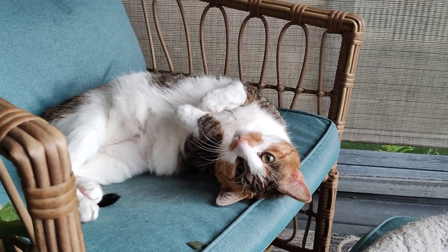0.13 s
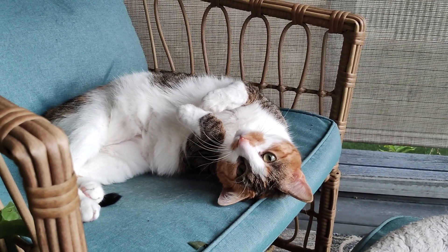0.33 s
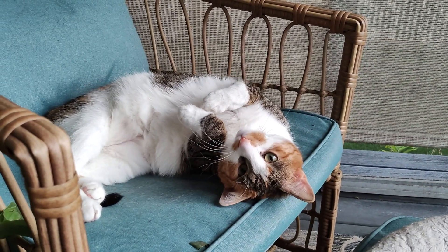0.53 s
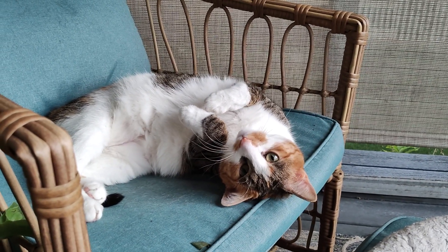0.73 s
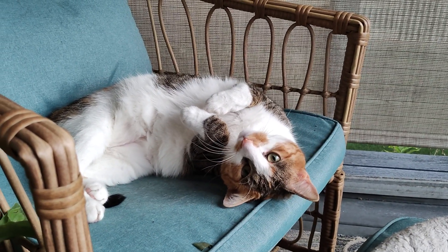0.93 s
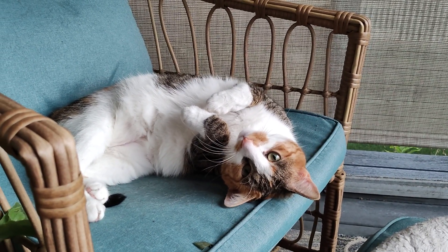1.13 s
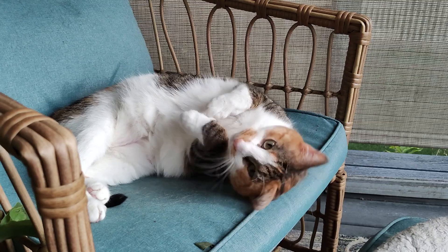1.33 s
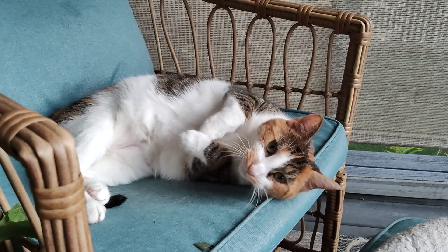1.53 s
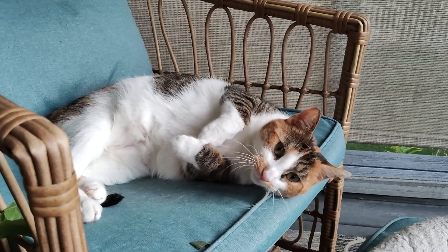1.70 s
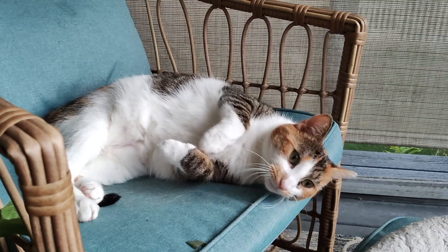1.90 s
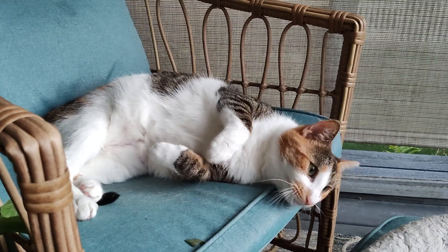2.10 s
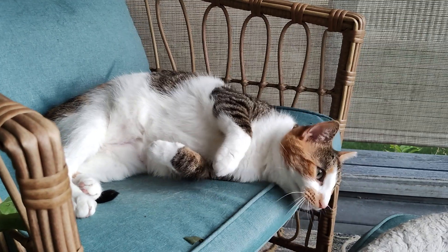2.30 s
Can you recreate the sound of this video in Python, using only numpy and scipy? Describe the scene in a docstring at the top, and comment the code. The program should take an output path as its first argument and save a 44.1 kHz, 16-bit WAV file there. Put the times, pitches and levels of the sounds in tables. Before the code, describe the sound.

A cat meows once, softly and close to the microphone, lifting in pitch at the end. A low electric hum and faint hiss swell with the call and settle, then a soft low bump follows in the quiet room.

```python
"""A room, heard on a stereo pair: a low electric hum and a faint hiss, perhaps light rain, lie behind.
Close to the microphones a cat gives one soft meow: it starts as a closed-mouth hum, opens to a bright
vowel as the resonances of the mouth move, then closes and lifts in pitch. The background swells with
the call and sinks after it. Last comes a soft low bump, perhaps the cat rolling over on the cushion."""
import sys
import numpy as np
from scipy import signal
from scipy.fft import rfft, irfft, next_fast_len
from scipy.io import wavfile
from scipy.ndimage import uniform_filter1d, map_coordinates

SR = 44100
rng = np.random.default_rng(int(sys.argv[2]) if len(sys.argv) > 2 else 0)


def dump(signal):
    """Clip the signal to [-1, 1] and save it as 16-bit WAV at the path in sys.argv[1]."""
    limited = np.clip(np.atleast_2d(signal).T, -1, 1)
    pcm = np.round(limited * 32767).astype(np.int16)
    wavfile.write(sys.argv[1], SR, pcm)


N = 103635


def amp(db):
    """Decibels to gain."""
    return 10 ** (np.asarray(db) / 20)


def unit(x):
    """Scale to rms 1."""
    return x / np.sqrt(np.mean(x ** 2) + 1e-20)


def along(points, hz):
    """Read (f/Hz, value) points on a log frequency axis."""
    freqs, values = np.transpose(points)
    return np.interp(np.log(hz + 1), np.log(freqs + 1), values)


def curves(rows):
    """One value per sample for each column after the time, corners rounded."""
    times, *columns = np.transpose(rows)
    return [uniform_filter1d(np.interp(np.arange(N) / SR, times, c), size=300) for c in columns]


def wobble(rate):
    """A smooth random curve, rate knots a second."""
    return map_coordinates(rng.standard_normal(2048), [np.arange(N) * rate / SR], mode="wrap")


def filtered(x, response):
    """Pass x through a response given as a function of frequency."""
    size = next_fast_len(N + SR // 2)
    return irfft(rfft(x, size) * response(np.fft.rfftfreq(size, 1 / SR)), size)[..., :N]


def resonance(hz, centre_hz, width_hz):
    """Gain of a peak that falls to half at width_hz from its centre."""
    return 1 / (1 + ((hz - centre_hz) / width_hz) ** 2)


def noise(colour):
    """Diffuse noise of rms 1: alike at both microphones in the bass, unrelated in the treble."""
    # likeness of left and right: f/Hz, correlation
    likeness = [(60, 0.91), (130, 1), (290, 0.87), (640, 0.67), (1410, 0), (3100, 0), (15000, 0)]

    def mid_and_side(hz):
        angle = np.arccos(np.clip(along(likeness, hz), -1, 1)) / 2
        return colour(hz) * np.array([np.cos(angle), np.sin(angle)])

    mid, side = filtered(rng.standard_normal((2, N)), mid_and_side)
    return unit(np.array([mid + side, mid - side]))


def hum():
    """An electric appliance: steady tones that waver in level and phase."""
    # hum lines: f/Hz, level/dB, waver/dB
    lines = [(119.8, -61.5, 1.8), (106.5, -72, 2.5), (240, -69.5, 3), (231.3, -75, 0), (298, -79, -4),
             (357.6, -72.5, 2.5), (636, -82, 4.5), (713, -79, -3.5), (735, -78.5, -0.5), (840, -75.5, 0),
             (974, -80, 4.5), (1308, -79, 0.5), (1649, -77.5, 3.5), (1660, -79, 3), (1733, -79.5, -5)]
    t = np.arange(N) / SR
    out = np.zeros(N)
    for hz, db, waver_db in lines:
        peak = np.sqrt(2) * amp(db + waver_db * wobble(12.09))
        out += peak * np.sin(2 * np.pi * (hz * t + rng.random()) + 0.43 * wobble(8.89))
    return out


def background(hiss_db=-61.5, rumble_db=-63.5, treble_hz=4500, left_lead_s=.0001):
    """Hiss, rumble and hum swell together and reach the left microphone first."""
    # swell around the call: t/s, body level/dB, treble level/dB
    swell = [(0, -1, 2.5), (.16, -2, 2), (.2, 3.5, 6.5), (.28, 7.5, 7.5), (.38, 8, 11.5), (.55, 9, 11.5),
             (.78, 10.5, 9), (.935, 10, 11.5), (.965, 6, 4), (1.1, 4, 3.5), (1.3, 1.5, 0), (1.6, 0, 1),
             (2.35, 0, -0.5)]
    # spectrum of the hiss: f/Hz, level/dB
    hiss_colour = [(240, -35), (400, -16), (500, -6), (680, -5.5), (860, -5), (1050, -6.5), (1500, -7.5),
                   (1700, -4), (2000, -7), (2800, -10), (4000, -14), (6000, -21), (7200, -19.5),
                   (8200, -25.5), (11200, -29.5), (11750, -27.5), (12600, -31.5), (15500, -37)]
    # spectrum of the rumble: f/Hz, level/dB
    rumble_colour = [(15, -45), (28, -20), (40, -6.5), (60, 0), (110, 0.5), (180, -0.5), (280, -4.5),
                     (450, -10), (900, -37.5)]
    body_db, treble_db = curves(swell)
    hiss = amp(hiss_db + 0.24 * wobble(21)) * noise(lambda hz: amp(along(hiss_colour, hz)))
    treble = filtered(hiss, lambda hz: 1 - resonance(hz, 0, treble_hz))
    hiss = amp(body_db) * (hiss - treble) + amp(treble_db + .4 * wobble(14)) * treble
    # rumble and hum follow only a share of the swell
    rumble_gain = amp(rumble_db + 0.92 * body_db + 1.2 * wobble(13.03))
    rumble = rumble_gain * noise(lambda hz: amp(along(rumble_colour, hz)))
    mix = hiss + rumble + amp(0.7 * body_db) * hum()
    return filtered(mix, lambda hz: np.exp(1j * np.pi * hz * left_lead_s * np.array([[1], [-1]])))


def formants():
    """The moving resonances of the cat's mouth and nose, each as (centre/Hz, gain, width/Hz)."""
    # All four list t/s, f/Hz, level/dB over the fundamental.
    # lowest mouth resonance, growing louder as the vowel opens, then climbing with the final lift in pitch
    low_mouth = [(.18, 910, -13), (.24, 850, -17.5), (.32, 830, -32), (.4, 844, -19.5), (.445, 824, -4.5),
                 (.56, 830, -1), (.698, 930, -0.5), (.712, 890, -10), (.728, 910, -1.5), (.785, 1010, 1),
                 (.82, 1019, -9), (.855, 1154, -10), (.93, 1070, -31)]
    # second resonance, falling from "ee" to "oo"
    vowel = [(.26, 3100, -42), (.285, 3050, -22.5), (.36, 3040, -11.5), (.435, 2530, -10.5),
             (.475, 2200, 0), (.515, 2120, 0.5), (.59, 1995, -0.5), (.625, 1830, -5.5), (.675, 1707, -10),
             (.72, 1530, -1), (.76, 1470, -12), (.81, 1340, -3.5), (.9, 1280, -19.5)]
    # nasal resonance of the closed-mouth start
    nasal = [(.18, 1340, -15), (.225, 1330, -21), (.28, 1320, -49), (.4, 1330, -55)]
    # high whistling resonance of the open mouth
    whistle = [(.33, 6500, -43), (.385, 6340, -25), (.43, 6200, -28), (.46, 7040, -28), (.53, 7020, -21),
               (.59, 7060, -24.5), (.62, 7150, -49)]
    tract = []
    for rows, width_hz in [(low_mouth, 175), (vowel, 121), (nasal, 121), (whistle, 250)]:
        centre_hz, db = curves(rows)
        tract.append((centre_hz, amp(db), width_hz))
    return tract


def meow(fall_db_per_octave=27.5, jitter=.003, shimmer_db=0.55, overtone_shimmer_db=0.62):
    """The cat, close up: clean harmonics of one pitch pass through the resonances of nose and mouth."""
    # pitch of the voice: t/s, f/Hz
    melody = [(.16, 454.5), (.23, 441), (.27, 440.5), (.325, 431), (.385, 434.7), (.45, 423.8), (.52, 420),
              (.6, 422.2), (.68, 427.3), (.75, 453.7), (.775, 478), (.805, 524.6), (.83, 579),
              (.855, 602.4), (.94, 625)]
    # strength of the fundamental: t/s, level/dB
    voice = [(.155, -69), (.19, -44.5), (.27, -34), (.35, -35), (.385, -33), (.45, -35.5), (.58, -34),
             (.66, -36.5), (.758, -34.5), (.788, -43), (.83, -42), (.87, -39), (.94, -38), (.96, -55)]
    # bright overtones of the open mouth: t/s, level/dB over the fundamental
    brightness = [(.255, -41), (.275, -24), (.33, -28.5), (.4, -17.5), (.46, -13), (.57, -16.5),
                  (.618, -21), (.632, -29), (.8, -50)]
    # colour of those overtones: f/Hz, level/dB
    bright_colour = [(1500, -36), (2100, -6), (2550, -2), (3000, -2), (3400, 2.5), (3800, -3.5),
                     (4300, -23.5), (5050, -28), (5500, -20), (7700, -50), (11200, -31), (15000, -34)]
    # balance at the microphone pair: f/Hz, left minus right/dB
    balance = [(430, 1.8), (600, 3.5), (850, 5), (950, -1.5), (1270, -1), (1700, -5.5), (2110, -8),
               (2550, 8), (3000, -2), (3400, -6), (3800, -12), (4500, -2), (7000, 22)]
    # phase at the pair: f/Hz, lead of the left/rad
    left_lead = [(430, 0.26), (620, 0.35), (850, 0.43), (1270, 0.53), (1700, 1.2), (2110, 2.1), (3000, 1.8),
                 (3400, 1.2), (7000, 2.3)]
    (pitch,), (voice_db,), (bright_db,) = curves(melody), curves(voice), curves(brightness)
    tract = formants()
    pitch = pitch * (1 + jitter * wobble(109.85))
    phase = 2 * np.pi * np.cumsum(pitch) / SR
    sides = np.array([[.5], [-.5]])
    out = np.zeros((2, N))
    for k in range(1, 28):
        hz = k * pitch
        gain = amp(-fall_db_per_octave * np.log2(k))
        if k > 1:  # resonances, plain overtone and brightness add in power
            power = sum((peak * resonance(hz, centre, width)) ** 2 for centre, peak, width in tract)
            power += gain ** 2 + amp(bright_db + along(bright_colour, hz)) ** 2
            gain = np.sqrt(power) * amp(overtone_shimmer_db * wobble(60.94))
        pan = amp(sides * along(balance, hz))
        pan /= np.linalg.norm(pan, axis=0)
        out += 2 * gain * pan * np.sin(k * phase + sides * along(left_lead, hz))
    t = np.arange(N) / SR
    voiced = (t > voice[0][0]) & (t < voice[-1][0])
    return out * voiced * amp(voice_db + shimmer_db * wobble(89.6))


def room(x, level_db=-21, t60_s=.25):
    """The room's short, weak echo, arriving 4 ms after the direct sound."""
    t = np.arange(SR // 3) / SR
    tail = rng.standard_normal((2, len(t))) * amp(-60 * t / t60_s) * (t > .004)
    tail /= np.linalg.norm(tail[0])
    return amp(level_db) * signal.fftconvolve(x, tail, axes=1)[:, :N]


def sheen():
    """Faint, narrow bands high in the hiss build during the call and linger after it."""
    # hiss bands: f/Hz, width/Hz, level/dB, start/s, full/s, fade from/s, gone/s (cut if before the fade)
    bands = [(11900, 280, -76.5, .25, 0.43, 1.04, 1.4), (7200, 300, -78, 0.18, .5, 1.34, 1.27)]
    t = np.arange(N) / SR
    out = np.zeros((2, N))
    for centre_hz, width_hz, db, *times in bands:
        envelope = amp(db) * np.interp(t, times, [0, 1, 1, 0])
        out += envelope * noise(lambda hz: resonance(hz, centre_hz, width_hz))
    return out


def bump(at_s=1.793, half_length_s=0.011, level_db=-52.5):
    """A soft low bump, perhaps the cat rolling over on the cushion."""
    t = np.arange(N) / SR
    envelope = amp(level_db) * np.exp(-((t - at_s) / half_length_s) ** 2)
    return envelope * noise(lambda hz: resonance(hz, centre_hz=140, width_hz=78))


def scene():
    """The cat near the microphones, its room and the background behind it."""
    cat = meow()
    return cat + room(cat) + bump() + background() + sheen()


def record(dry):
    """The recorder passes nothing above 15720 Hz."""
    return filtered(dry, lambda hz: hz < 15720)


dry = scene()
out = record(dry)
dump(out)
```